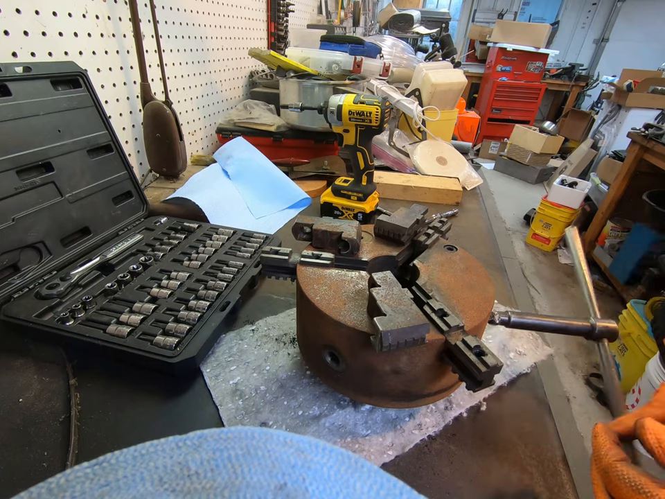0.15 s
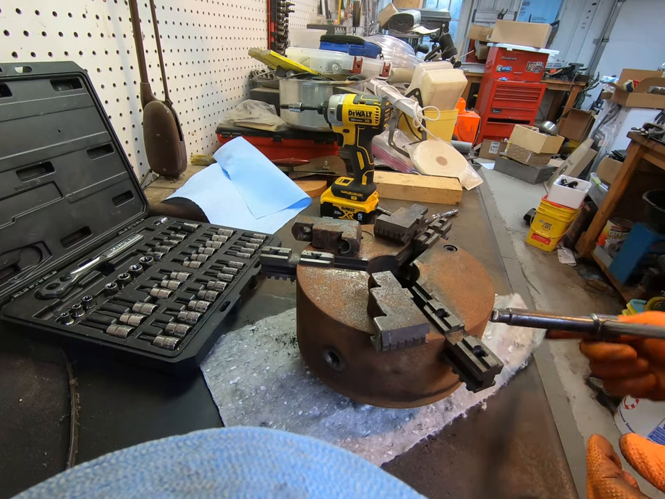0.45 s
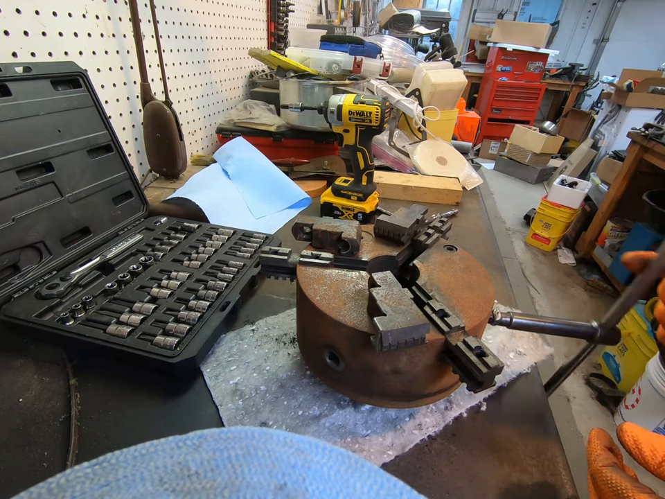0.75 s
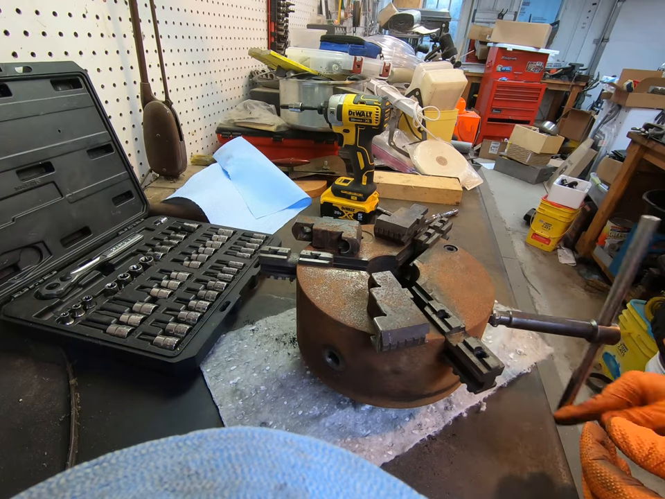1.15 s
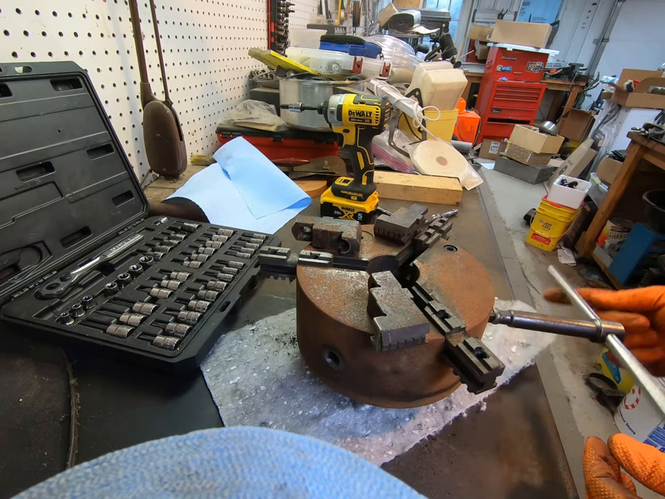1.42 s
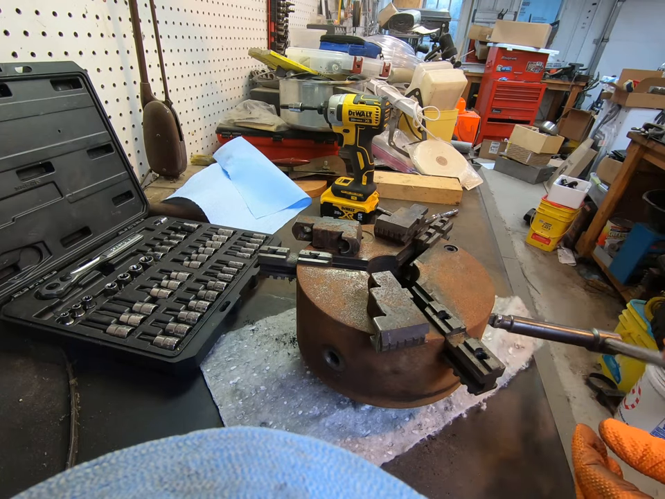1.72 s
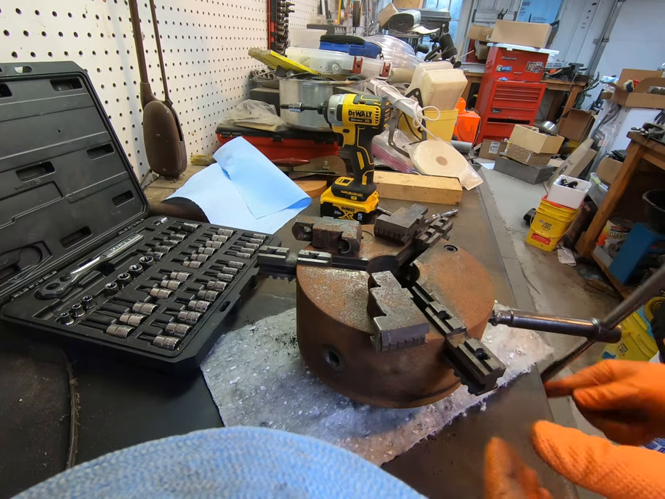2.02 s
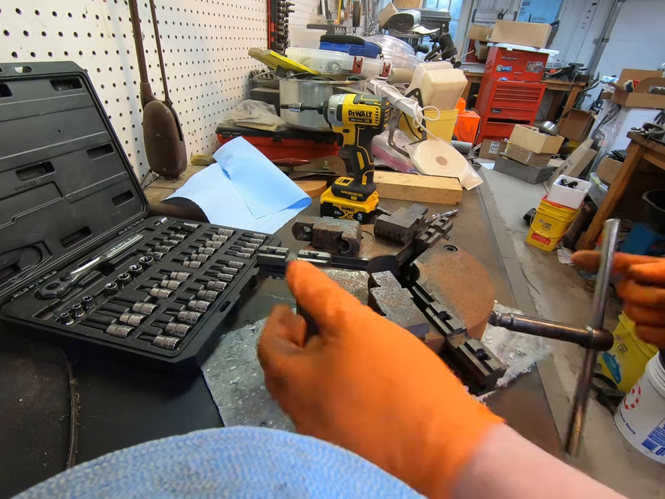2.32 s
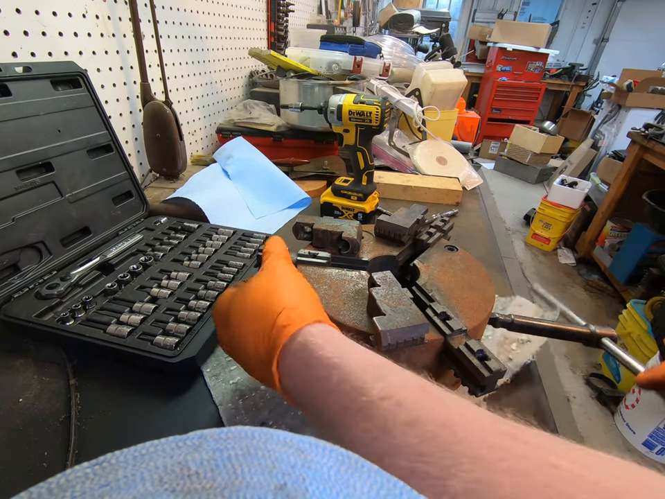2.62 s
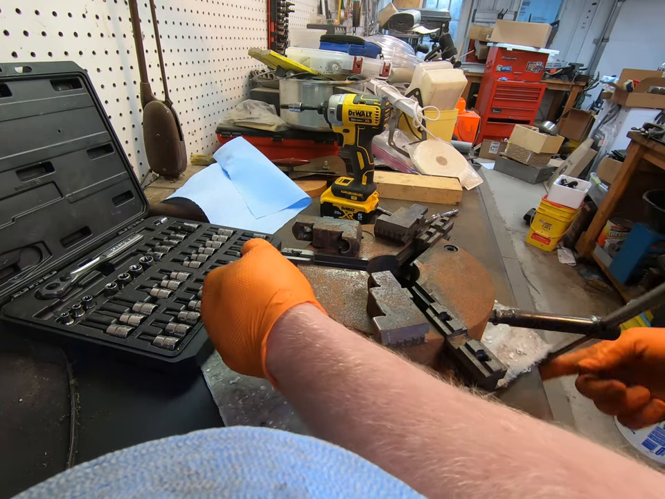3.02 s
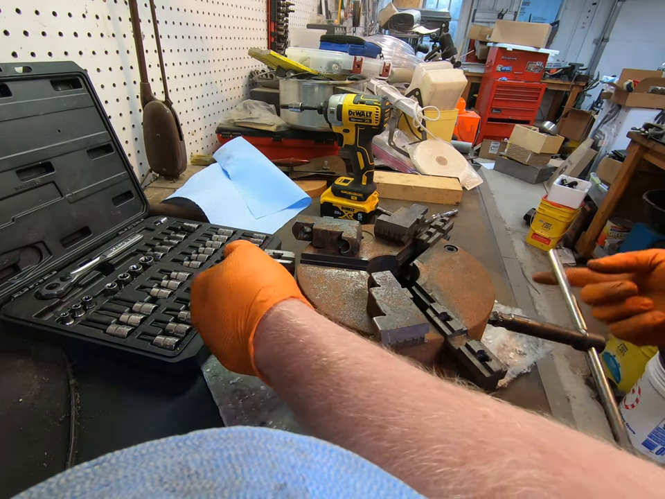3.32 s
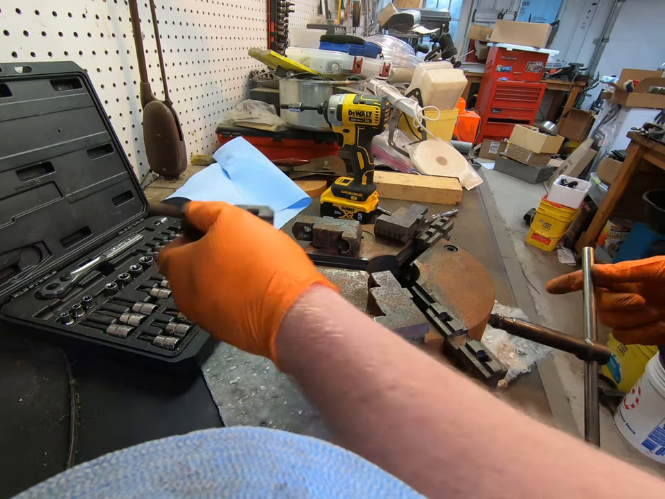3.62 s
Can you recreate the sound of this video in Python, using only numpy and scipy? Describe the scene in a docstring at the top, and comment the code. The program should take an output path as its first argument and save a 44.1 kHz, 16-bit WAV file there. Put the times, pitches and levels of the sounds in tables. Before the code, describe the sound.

A rusty lathe chuck grinds and clicks as a key turns it in uneven strokes. About once a turn the gears slip with a rasp and the workbench booms into close microphones. Gloves rustle softly in the workshop.

```python
"""Dry gears grind and click as a T-handled key winds a rusty lathe chuck lying loose on a workbench.
Each contact rings the steel. Once a turn the gears bind and slip with a rasp and the chuck rocks:
the bench booms and hums into the microphones standing on it, and loose tools buzz.
Gloves and sleeves rustle softly; at the end the handle clinks and rings."""
import sys
import numpy as np
from scipy import signal
from scipy.io import wavfile
from scipy.ndimage import uniform_filter1d

SR = 44100
rng = np.random.default_rng(int(sys.argv[2]) if len(sys.argv) > 2 else 0)


def store_pcm(level_fs):
    """Save levels as 16-bit WAV."""
    pcm = np.round(np.clip(level_fs, -1, 1) * 32767).astype(np.int16)
    wavfile.write(sys.argv[1], SR, np.atleast_2d(pcm).T)


N = 165375
T = np.arange(N) / SR

# gear grinding, one list per turn: time_s, groan_db, grit_db
GRIND_TURNS = [
    [(0.0, -55, -62.5), (0.212, -57, -61), (0.334, -49, -52), (0.4, -58, -67), (0.572, -64, -66.5),
     (0.698, -56.5, -51.5), (0.83, -54, -64), (0.93, -72, -72)],
    [(0.93, -48, -56), (0.976, -60.5, -91), (1.122, -60.5, -59), (1.256, -64, -62), (1.514, -62.5, -69),
     (1.614, -51.5, -51), (1.724, -54.5, -57.5), (1.8, -57, -52.5)],
    [(1.8, -57, -60), (1.956, -60, -59.5), (2.092, -54, -57), (2.146, -64.5, -76), (2.31, -80, -60.5),
     (2.43, -48.5, -68), (2.546, -57, -70), (2.63, -64.5, -49)],
    [(2.63, -52.5, -60.5), (2.826, -53.5, -60), (2.982, -66, -58), (3.062, -79, -104), (3.272, -65, -58.5),
     (3.39, -53, -50), (3.512, -65, -85), (3.602, -94, -84.5), (3.75, -64, -59.5)],
]
# key and gear clicks: start_s, tick_db, chatter_db, bass_db, treble_db, pitch_hz, ping_db
CLICKS = [(0.006, -24, -37, -1.5, -17, 1314, 2.5), (0.119, -40, -29.5, 5, -21, 824, 0),
          (0.221, -26.5, -50, -0.5, -23, 1180, -4), (0.269, -39.5, -55, 5, -49, 830, 11.5),
          (0.297, -37.5, -39.5, 8.5, -42, 993, -9), (0.367, -32.5, -31.5, -8.5, -14, 1220, 4),
          (0.375, -28.5, -33, -19, -15.5, 1200, -8), (0.596, -37, -29.5, -34, -19, 1280, -11),
          (0.605, -31, -39.5, -14, -5, 1190, -23), (0.643, -27.5, -36.5, -42, -18, 1200, -8),
          (0.665, -28.5, -55, -18, -21, 2850, 2), (0.678, -28, -37, -3.5, -49, 956, 5.5),
          (0.728, -24.5, -31.5, -8, -9.5, 1210, -6), (0.744, -26.5, -29.5, -6, -8, 785, 5.5),
          (0.774, -40, -36.5, -12, -25, 960, -3), (0.814, -26.5, -33.5, -6.5, -33, 1280, 1),
          (0.914, -40, -34.5, -9.5, -21, 1210, -24), (0.955, -15, -35, -44, -36, 1280, -2),
          (1.031, -35, -42, -5, -24, 1120, 7.5), (1.091, -43, -55, -24, -42, 1310, 11),
          (1.147, -47, -37.5, -5.5, -49, 980, 16), (1.172, -31, -31, -8.5, -27, 1260, 3),
          (1.256, -35.5, -38.5, 3.5, -27, 794, -24), (1.375, -71, -59.5, -16, -37, 1000, -5),
          (1.493, -29, -32.5, -9, -9, 2630, 10.5), (1.53, -30.5, -40, -20, -38, 1690, -4),
          (1.568, -28, -30, -6.5, -41, 830, -23), (1.611, -28, -42, -2, -54, 1200, -2),
          (1.63, -15, -31.5, -9, -67, 1318, 6.5), (1.68, -31.5, -31, 2.5, -28, 840, -2),
          (1.756, -42.5, -44, -3, -46, 1320, -3), (1.81, -35, -20, -9, -19, 1460, -9),
          (1.826, -10.5, -21, -18.5, -18, 1260, -22), (1.885, -23, -24.5, -18.5, -26, 2320, 6),
          (1.892, -21, -25, -16.5, -14.5, 1420, -28), (1.935, -41, -55, -18, -38, 1020, 3),
          (1.957, -32, -55, -4.5, -26, 1160, 4), (1.975, -32, -34, -12, -17.5, 1220, 9),
          (1.986, -46, -36.5, -1.5, -21, 1200, -5), (2.061, -41.5, -42, 6.5, -34, 1210, 11.5),
          (2.335, -34, -36, -19, -15, 2200, -8), (2.357, -31.5, -34, -25, -38, 3860, 10),
          (2.372, -18, -24.5, -17, -17.5, 2640, 0.5), (2.378, -16, -23, -35, -24, 1190, -1),
          (2.408, -16.5, -37, -9, -38, 1050, -1), (2.433, -6.5, -15.5, -34, -50, 1203, -7),
          (2.459, -18, -29, -7, -52, 1280, -11), (2.487, -7, -18, -17.5, -61, 1320, -39),
          (2.619, -29, -33, -25, -16, 1120, -10), (2.638, -19.5, -39, -29, -11.5, 2600, -2),
          (2.861, -34, -33.5, -4.5, -20, 845, -1), (2.947, -32, -37.5, -2, -19, 1340, 2),
          (2.975, -54, -62, -21, 2, 1240, -7), (3.275, -28.5, -33.5, -17, -9.5, 1830, 2),
          (3.354, -35.5, -46, -27, -24, 1760, 7), (3.373, -30, -29.5, -43, -17, 1335, 14.5),
          (3.377, -24, -32, -3.5, -20, 1310, -19), (3.398, -27, -37, -22, -12.5, 1760, 6.5),
          (3.535, -42.5, -50.5, -6, -16, 1290, -1), (3.673, -30.5, -30, -18, -11, 3800, 9)]
# contact spectra, three bands: freq_hz, level_db
BASS_SPECTRUM = [(60, -26.5), (150, 9.5), (250, -0.5), (450, -2), (700, -17), (1100, -26.5), (3000, -83.5)]
MIDDLE_SPECTRUM = [(150, -42), (500, -7), (850, -5.5), (1250, 5.5), (1750, -4), (2700, -1), (3300, -10.5),
                   (4100, -17.5), (5200, -32), (10000, -90.5)]
TREBLE_SPECTRUM = [(1000, -57.5), (2800, -15.5), (3500, 11), (4050, 8.5), (4900, 2.5), (5700, -2),
                   (7700, -3), (9300, -17), (11500, -35.5), (16000, -50.5)]
# chuck and key modes: freq_hz, level_db, t60_s
STEEL_MODES = [(450, 0, 0.062), (638, 2.5, 0.18), (823.2, 12.5, 0.12), (1034, -17.5, 0.36),
               (1218, -3, 0.19), (1310, -42.5, .12), (1900, -22.5, 0.29), (2234, -12.5, 0.32),
               (2650, -36.5, 0.11), (2930, -14.5, 0.086), (2770, -7.5, 0.052), (3470, 0.5, .15),
               (3880, 10, 0.098), (5140, 6, 0.23)]
# bench hum: time_s, level_db
HUM_LEVELS = [(0, -12.5), (.1, -41.5), (.3, -36.5), (.5, -29.5), (.65, -44), (.8, -39.5), (.92, -33),
              (1.25, -29), (1.38, -29), (1.5, -41.5), (1.68, -40.5), (2.05, -32), (2.28, -40), (2.47, -32),
              (2.6, -43), (2.85, -37), (3.05, -29.5), (3.22, -46), (3.5, -27), (3.75, -39.5)]
# spectra of bench hum, bench shudder, room air: freq_hz, level_db
HUM_SPECTRUM = [(15, -41.5), (26, -8), (32, 1), (37, 16), (43, -10), (56, -22.5), (80, -15.5), (120, -20.5),
                (165, -24), (230, -37), (400, -66.5), (1000, -80)]
SHUDDER_SPECTRUM = [(40, -23), (60, -16), (80, 6.5), (115, -10.5), (160, -7.5), (230, -15.5), (330, -52),
                    (800, -80.5)]
AIR_SPECTRUM = [(20, 1), (100, -13), (250, -25.5), (600, -21.5), (1200, -20), (3000, -49.5), (6000, -35.5),
                (9000, -39.5), (12000, -77.5), (16000, -81.5)]
# chuck body knocks: start_s, pitch_hz, level_db
KNOCKS = [(.119, 220, -36), (.68, 330, -39.5), (.743, 369, -32.5), (1.577, 373, -34), (1.683, 377, -29),
          (1.776, 263, -30.5), (1.812, 336, -28.5), (2.378, 457, -35.5), (2.435, 443, -32),
          (2.485, 415, -34), (3.331, 250, -28.5)]
# gear slips: start_s, length_s, level_db, treble_db, pitch_hz, rasp_db
SLIPS = [(0.136, 0.037, -33.5, -12, 2730, -5), (0.94, 0.016, -36.5, -14, 2810, -1),
         (1.819, 0.016, -37.5, -9, 2480, -0.5), (2.643, 0.019, -35.5, -9, 2820, -7.5)]
# chuck rocking on the bench: start_s, level_db, push_s
ROCKS = [(.146, -4, 0.0056), (0.37, -15, 0.0049), (0.733, -17, 0.0026), (0.949, -6, 0.0052),
         (1.184, -11, 0.0043), (1.821, -6, 0.0016), (1.988, -8.5, 0.015), (2.644, -2, 0.006),
         (2.874, -9.5, 0.0087), (3.394, -11.5, 0.0089)]
# bench modes: freq_hz, level_db, t60_s
BENCH_MODES = [(32.77, -15, 1.0), (39.67, -8, 0.45), (49.6, -21.5, 1), (75.96, -3.5, 0.23),
               (93.2, -2, 0.11), (147.2, -24, 0.4), (187.7, -27.5, 0.6), (223.7, -18.5, .2)]
# loose tools: freq_hz, level_db
BUZZ_SPECTRUM = [(200, -34), (400, 4.5), (520, -7.5), (620, 5), (750, -5), (1000, -11.5), (2000, -16),
                 (6000, -66)]
# sleeve and glove swishes, glove rubs on the handle: centre_s, half_length_s, level_db
SWISHES = [(.36, 0.08, -72), (1.28, .06, -68), (1.75, 0.16, -75), (2.12, 0.12, -72), (2.34, 0.1, -69),
           (2.545, 0.085, -58.5), (2.64, 0.12, -61), (2.97, 0.082, -69), (3.25, 0.087, -68.5),
           (3.335, .035, -63), (3.71, 0.1, -71.5)]
RUBS = [(1.54, 0.029, -62.5), (2.55, 0.061, -70), (3.0, 0.14, -67.5), (3.3, 0.02, -58), (3.7, 0.029, -61.5)]
# their spectra: freq_hz, level_db
SWISH_SPECTRUM = [(500, -25), (2000, -4.5), (4000, -3), (5500, -1.5), (8000, -1), (9500, -5.5),
                  (11000, -19.5), (12500, -34), (16000, -38.5)]
RUB_SPECTRUM = [(600, -62), (1500, -8), (2400, 1), (3100, 4.5), (3900, 5), (4700, -10), (7000, -12),
                (12000, -39)]
# handle clinks: start_s, level_db
CLINKS = [(3.674, -63)]
# handle modes: freq_hz, level_db, t60_s
HANDLE_MODES = [(1890, 0, .25), (2200, 8.5, 0.31), (2200, -7, 0.57), (3730, 11, 0.038), (3960, 10.5, 0.064),
                (7100, -2.5, 0.51)]

GRIND_LEVELS = [row for turn in GRIND_TURNS for row in turn]
BAND_WIDTHS, CLICK_GAINS_DB = (0.2, 0.32, 1.1), (26, 14, 18)  # bass, middle, treble
SEAT_DELAY_S = 0.000998


def amp(db):
    """Decibels to gain."""
    return 10 ** (np.asarray(db) / 20)


def unit(x):
    """Scale to rms 1."""
    return x / np.sqrt(np.mean(x ** 2) + 1e-20)


def add(mix, start_s, sound):
    """Mix a sound in at start_s."""
    part = mix[..., max(round(start_s * SR), 0):][..., :sound.shape[-1]]
    part += sound[..., :part.shape[-1]]


def envelope(rows, column=1):
    """Smoothed gain over time from one dB column."""
    rows = np.array(rows)
    return amp(uniform_filter1d(np.interp(T, rows[:, 0], rows[:, column]), size=600))


def through(x, response):
    """Convolve with an impulse response."""
    return signal.fftconvolve(np.atleast_2d(x), np.atleast_2d(response), axes=1)[:, :N]


def colour(x, spectrum, size=8192):
    """Minimum-phase filter of unit energy."""
    hz, db = np.transpose(spectrum)
    bins_hz = abs(np.fft.fftfreq(size, 1 / SR)) + 1
    log_gain = np.log(amp(np.interp(np.log(bins_hz), np.log(hz), db)))
    taps = np.fft.ifft(np.exp(np.conj(signal.hilbert(log_gain)))).real[:size // 2]
    return through(x, taps / np.linalg.norm(taps))


def spread(pair, width):
    """Mid and side to left and right; width is side over mid."""
    return np.array([pair[0] + width * pair[1], pair[0] - width * pair[1]]) / np.hypot(1, width)


def grains(per_s, spread_db, size=N):
    """Random impulses of uneven strength, rms 1."""
    fires = rng.random(size) < per_s / SR
    strength = amp(spread_db * np.minimum(rng.exponential(1, size), 4))
    return unit(fires * strength * rng.choice([-1, 1], size))


def tail(t60_s, width, rise_s):
    """Decaying stereo noise of unit energy."""
    t = T[:SR // 2]
    cloud = spread(rng.standard_normal((2, len(t))), width)
    cloud *= amp(-60 * t / t60_s) * (1 - np.exp(-(t / rise_s) ** 2))
    return cloud / np.sqrt(np.sum(cloud ** 2) / 2)


def ring(modes, t):
    """Damped complex modes of alternating sign."""
    return sum((-1) ** k * amp(db - 60 * t / t60_s) * np.exp(2j * np.pi * hz * t)
               for k, (hz, db, t60_s) in enumerate(modes))


def ping(pitch_hz, t60_s, rise_s=0.00032):
    """One short mode with a soft onset."""
    t = T[:SR // 10]
    return ring([(pitch_hz, 0, t60_s)], t).imag * (1 - np.exp(-(t / rise_s) ** 3))


def contact(width, tick_db=0, chatter_db=0):
    """A part seats with a tick; loose parts chatter briefly."""
    force = amp(chatter_db - 4.5) * tail(t60_s=0.045, width=width, rise_s=0.00079)
    force[:, round(SEAT_DELAY_S * SR)] += amp(tick_db)
    return force


def grind_forces():
    """Dry gears: dense tiny contacts, groan in the bass, grit in middle and treble."""
    grit = amp(-7) * grains(per_s=460, spread_db=5.5) * envelope(GRIND_LEVELS, column=2)
    groan = amp(0.5) * grains(per_s=780, spread_db=2) * envelope(GRIND_LEVELS)
    bands = (groan, grit, amp(-20.5) * grit)
    return np.array([through(band, contact(width)) for band, width in zip(bands, BAND_WIDTHS)])


def rust(pitches_hz=(1026, 1330, 1756, 2105, 2645, 2910)):
    """Rust grains ring briefly over a fine friction hiss."""
    pings = sum(through(grains(per_s=35, spread_db=3.3), ping(hz, t60_s=0.012)) for hz in pitches_hz)
    friction = through(grains(per_s=2500, spread_db=3), ping(pitch_hz=2500, t60_s=0.00082))
    return (amp(-5.5) * unit(pings) + amp(-22) * unit(friction)) * envelope(GRIND_LEVELS, column=2)


def bench_tremor():
    """Grinding keeps the bench trembling: two independent channels of low noise."""
    hum = unit(colour(rng.standard_normal((2, N)), HUM_SPECTRUM)) * envelope(HUM_LEVELS)
    shudder = colour(rng.standard_normal((2, N)), SHUDDER_SPECTRUM) * envelope(GRIND_LEVELS)
    return hum + amp(17) * shudder


def click_forces():
    """Key and gears strike: one contact per click and band."""
    forces = np.zeros((3, 2, N))
    for start_s, tick_db, chatter_db, bass_db, treble_db, _, _ in CLICKS:
        for band, band_db in enumerate((bass_db, 0, treble_db)):
            hit = contact(BAND_WIDTHS[band], tick_db - 12, chatter_db)
            add(forces[band], start_s, amp(band_db + CLICK_GAINS_DB[band]) * hit)
    return forces


def click_pings():
    """Each contact point rings at its own pitch as it seats."""
    out = np.zeros(N)
    for start_s, tick_db, _, _, _, pitch_hz, ping_db in CLICKS:
        add(out, start_s + SEAT_DELAY_S, amp(tick_db + ping_db - 11) * ping(pitch_hz, t60_s=0.013))
    return out


def knocks(t60_s=0.038, rise_s=0.0005):
    """The heavy chuck body shifts with a dull note."""
    out, t = np.zeros(N), T[:SR // 5]
    attack = 1 - np.exp(-t / rise_s)
    for start_s, pitch_hz, db in KNOCKS:
        add(out, start_s, attack * ring([(pitch_hz, db, t60_s)], t).imag)
    return out


def slip_burst(length_s):
    """One slip: dense grains swell and fade, rms 1."""
    burst = grains(per_s=1200, spread_db=3.5, size=SR // 10)[:int(length_s * SR)]
    return unit(burst * np.sin(np.linspace(0.3, 2.6, len(burst))))


def slip_forces():
    """Bound gears let go: a burst of contacts in three bands."""
    forces = np.zeros((3, 2, N))
    for start_s, length_s, db, treble_db, _, _ in SLIPS:
        burst = slip_burst(length_s)
        for band, band_db in enumerate((-11, -2, treble_db)):
            scrape = through(burst, contact(BAND_WIDTHS[band], chatter_db=-2))
            add(forces[band], start_s, amp(db + band_db) * scrape)
    return forces


def slip_rasps():
    """Each slip drives one short resonance."""
    out = np.zeros((1, N))
    for start_s, length_s, db, _, pitch_hz, rasp_db in SLIPS:
        mode = ping(pitch_hz, t60_s=0.0078)
        add(out, start_s, amp(db + rasp_db) * through(slip_burst(length_s), mode / np.linalg.norm(mode)))
    return out


def chuck():
    """All contacts ring the steel; the workshop reflects the sum."""
    bass, middle, treble = click_forces() + slip_forces() + grind_forces()
    hits = colour(bass, BASS_SPECTRUM) + colour(middle, MIDDLE_SPECTRUM) + colour(treble, TREBLE_SPECTRUM)
    hits += click_pings() + slip_rasps() + rust() + knocks()
    steel = ring(STEEL_MODES, T[:SR // 2]).real
    direct = hits + amp(-17) * through(hits, steel / np.linalg.norm(steel))
    room = tail(t60_s=0.2, width=0.67, rise_s=0.002)
    return direct + amp(-8.5) * through(direct, room)


def bench(left_phase_rad=2.55):
    """Each rock booms the bench; boom and tremor shake the two microphones in near opposition."""
    shake = np.zeros(N, complex)
    boom = 1j * ring(BENCH_MODES, T[:2 * SR])
    for start_s, db, push_s in ROCKS:
        push = np.hanning(int(push_s * SR) + 3)
        add(shake, start_s, amp(db) * signal.fftconvolve(boom, push / push.sum()))
    shared_tremor, left_tremor = bench_tremor()
    shake += signal.hilbert(shared_tremor, 2 * N)[:N]
    left = amp(-8.5) * (shake * np.exp(1j * left_phase_rad)).real + amp(-7.5) * left_tremor
    return np.array([left, shake.real])


def tool_buzz(t60_s=0.53, rise_s=0.041):
    """Loose tools chatter on the bench after every rock."""
    power, t = np.zeros(N), T[:SR]
    for start_s, db, _ in ROCKS:
        shaking = amp(db - 60 * t / t60_s) * (1 - np.exp(-t / rise_s))
        add(power, start_s, shaking ** 2)
    chatter = spread([grains(per_s=900, spread_db=2) for _ in range(2)], width=0.45)
    return amp(-40) * colour(chatter * np.sqrt(power), BUZZ_SPECTRUM)


def rustle(strokes, spectrum, width):
    """Glove or sleeve: fine-grained hiss swells and fades with each hand movement."""
    power = sum(amp(2 * db) * np.exp(-2 * ((T - centre_s) / half_s) ** 2)
                for centre_s, half_s, db in strokes)
    hiss = spread([grains(per_s=8000, spread_db=1.3) for _ in range(2)], width)
    return colour(hiss, spectrum) * np.sqrt(power)


def handle_clink():
    """The sliding handle drops against its stop and rings on."""
    out = np.zeros(N)
    for start_s, db in CLINKS:
        add(out, start_s, amp(db) * ring(HANDLE_MODES, T[:SR // 2]).imag)
    return out


def scene():
    """Chuck, bench, tools, cloth and handle over still workshop air."""
    air = amp(-63) * unit(colour(spread(rng.standard_normal((2, N)), width=1.0), AIR_SPECTRUM))
    balance = amp([[-0.4], [0.4]])
    work = balance * chuck() + bench() + tool_buzz()
    cloth = rustle(SWISHES, SWISH_SPECTRUM, width=0.91) + rustle(RUBS, RUB_SPECTRUM, width=0.25)
    return air + work + cloth + handle_clink()


def record(dry, cutoff_hz=15000):
    """Low-pass band limit."""
    taps = signal.firwin(511, cutoff_hz, window=("kaiser", 9), fs=SR)
    return signal.oaconvolve(dry, taps[None], "same")


dry = scene()
out = record(dry)
store_pcm(out)
```